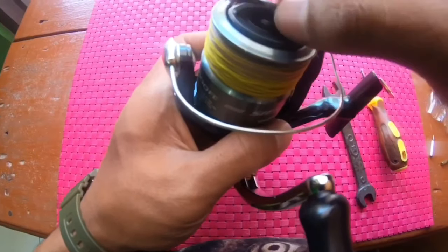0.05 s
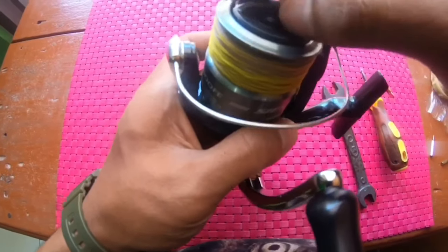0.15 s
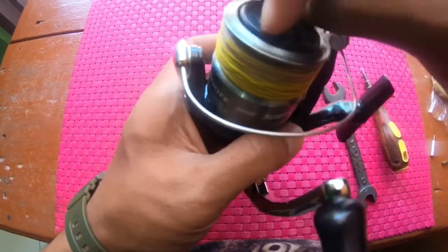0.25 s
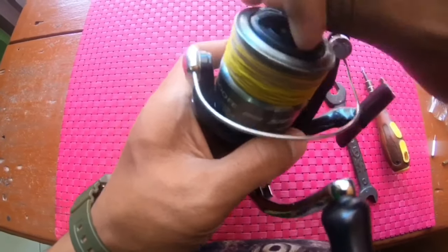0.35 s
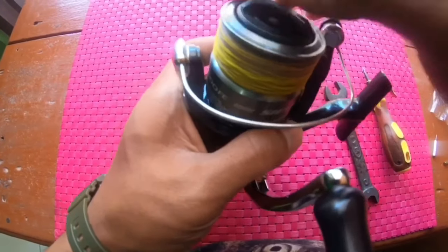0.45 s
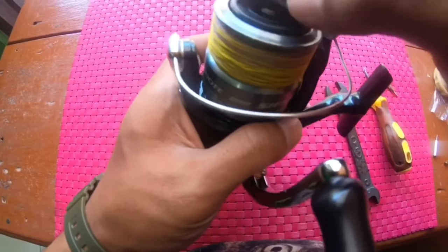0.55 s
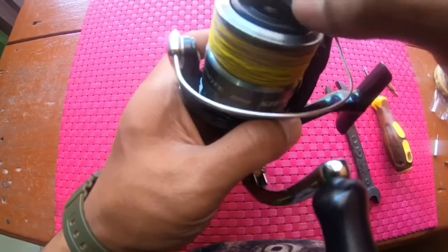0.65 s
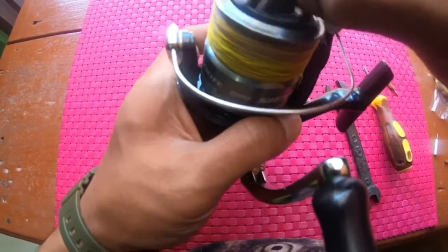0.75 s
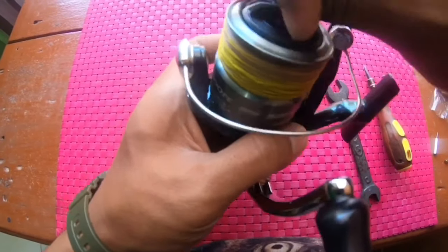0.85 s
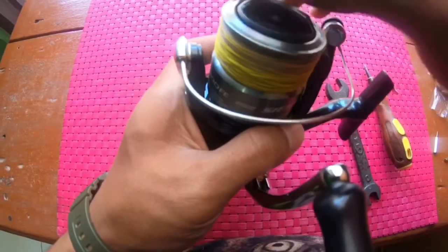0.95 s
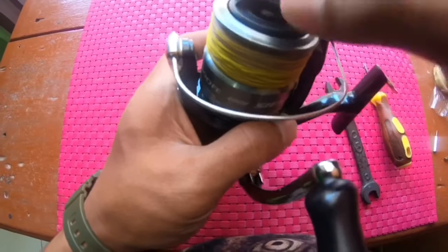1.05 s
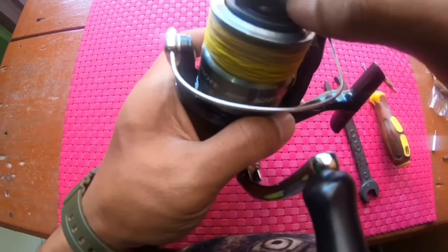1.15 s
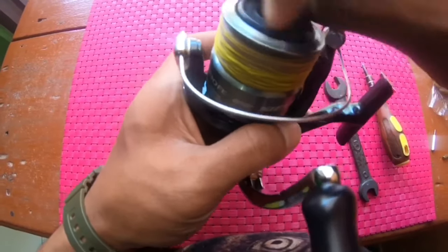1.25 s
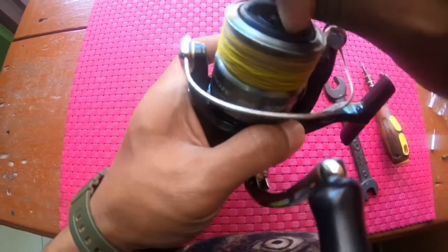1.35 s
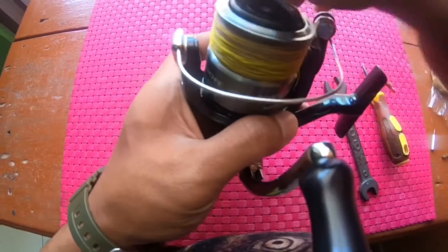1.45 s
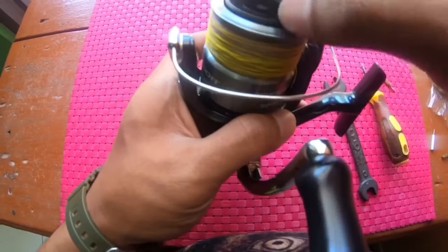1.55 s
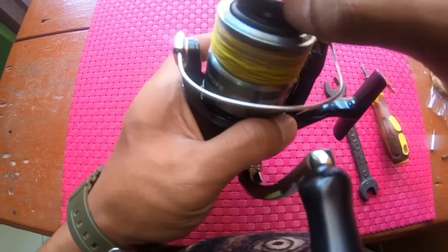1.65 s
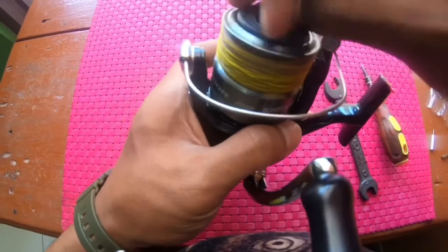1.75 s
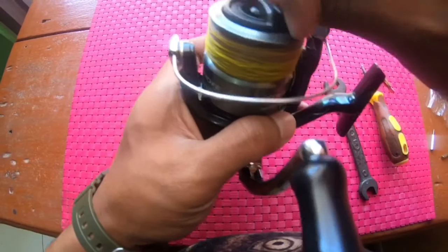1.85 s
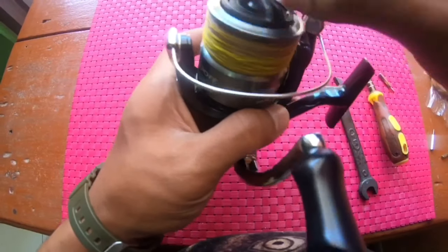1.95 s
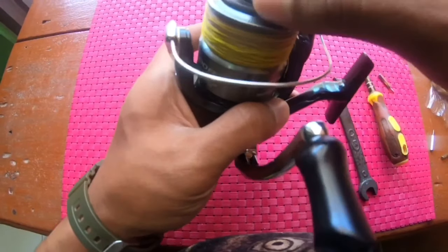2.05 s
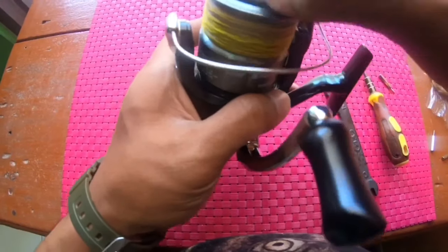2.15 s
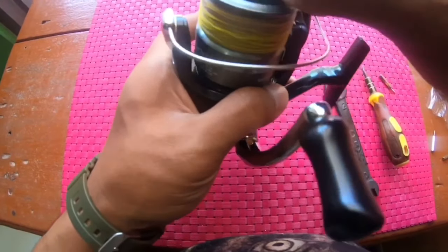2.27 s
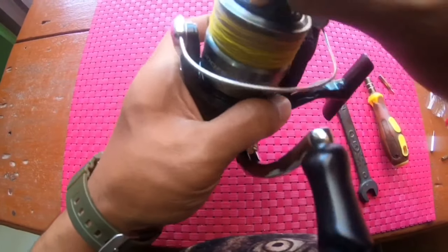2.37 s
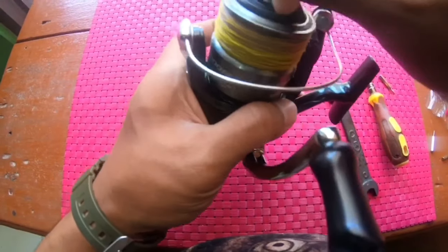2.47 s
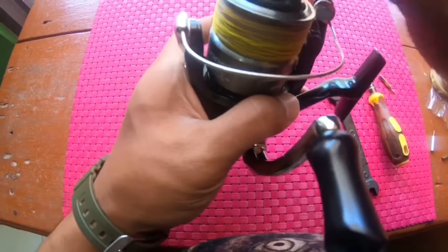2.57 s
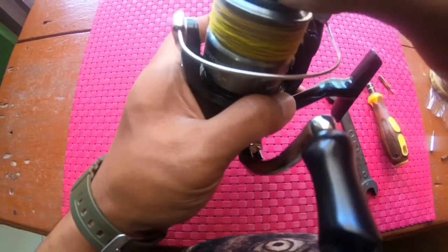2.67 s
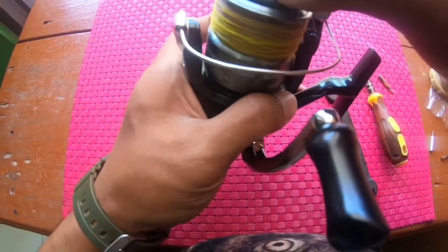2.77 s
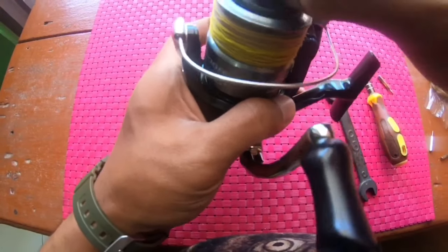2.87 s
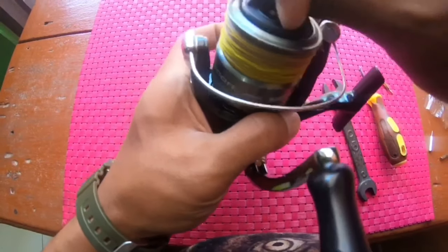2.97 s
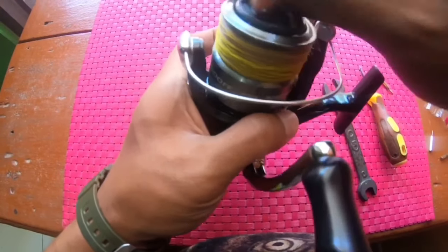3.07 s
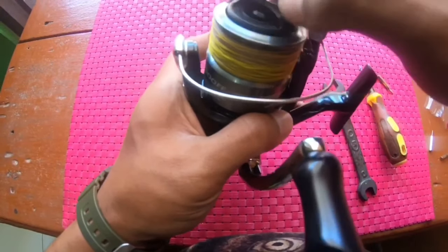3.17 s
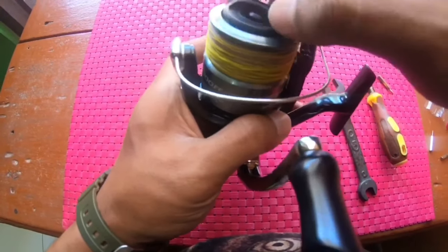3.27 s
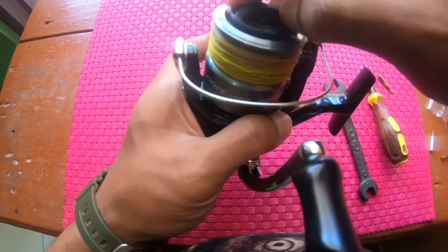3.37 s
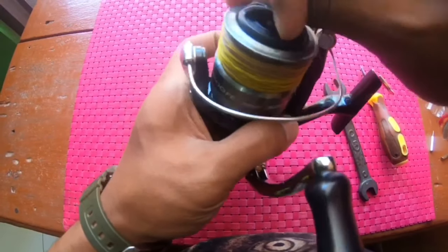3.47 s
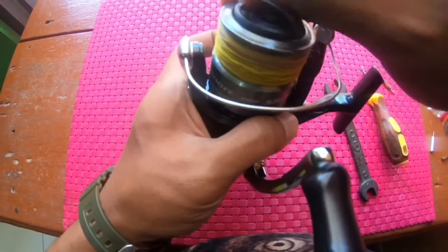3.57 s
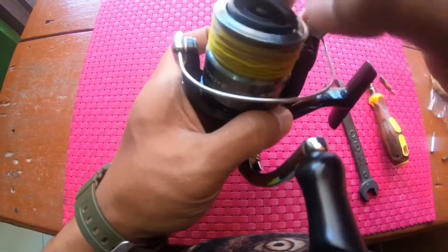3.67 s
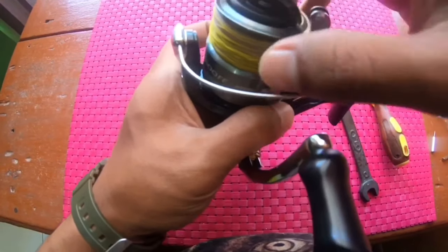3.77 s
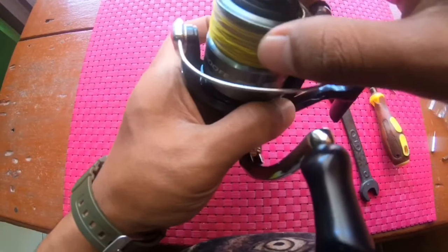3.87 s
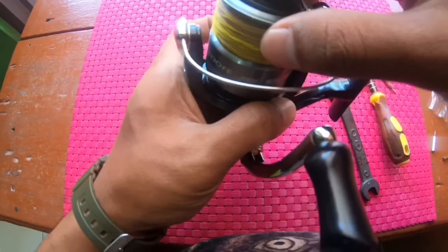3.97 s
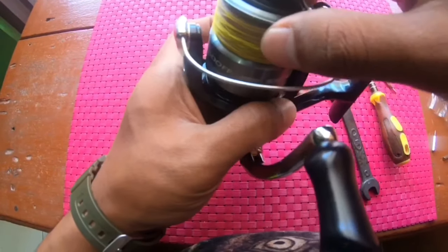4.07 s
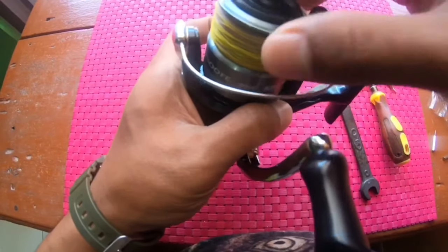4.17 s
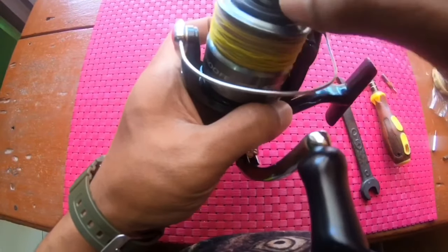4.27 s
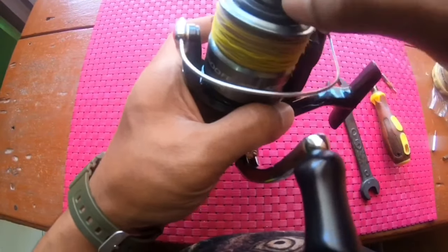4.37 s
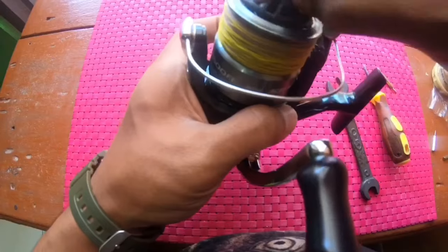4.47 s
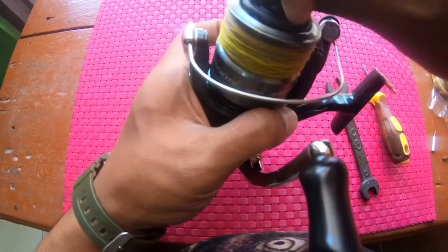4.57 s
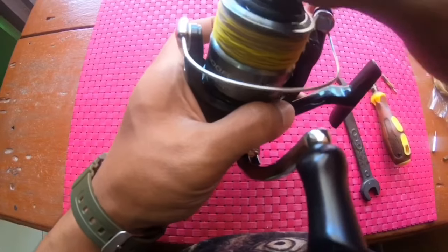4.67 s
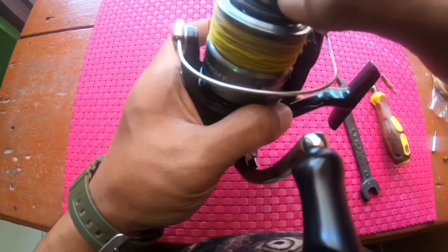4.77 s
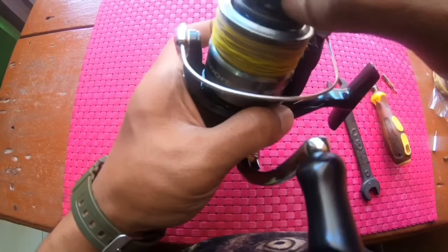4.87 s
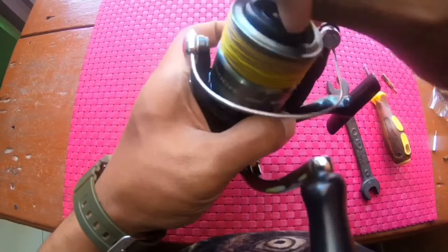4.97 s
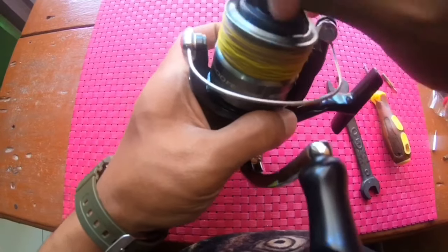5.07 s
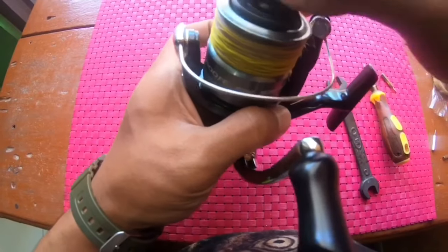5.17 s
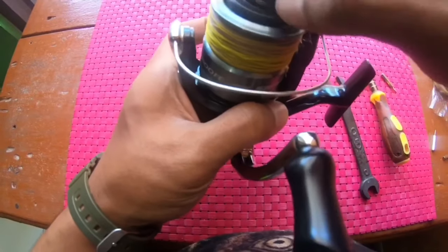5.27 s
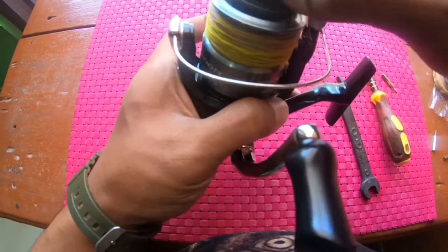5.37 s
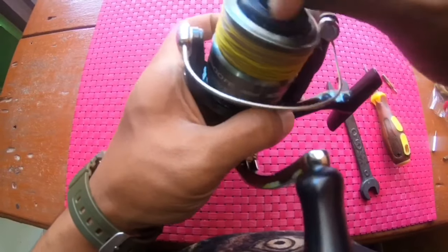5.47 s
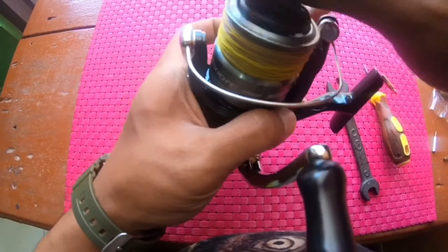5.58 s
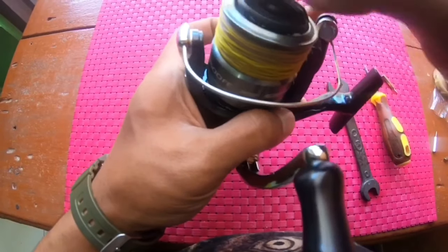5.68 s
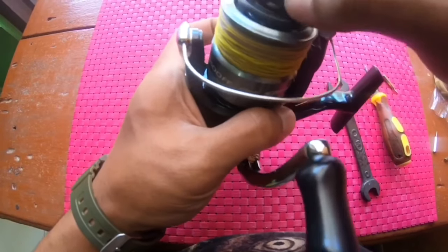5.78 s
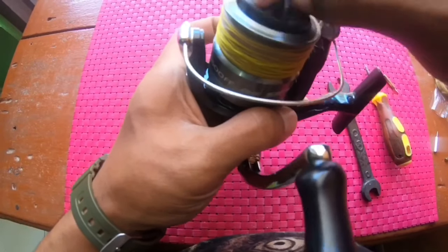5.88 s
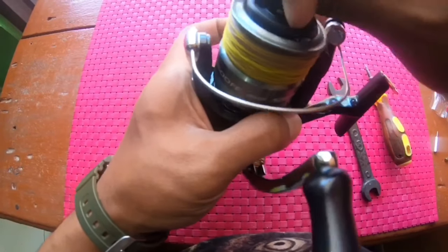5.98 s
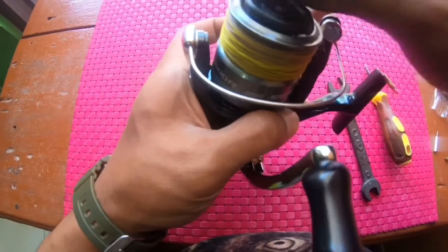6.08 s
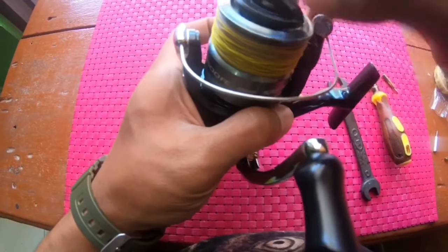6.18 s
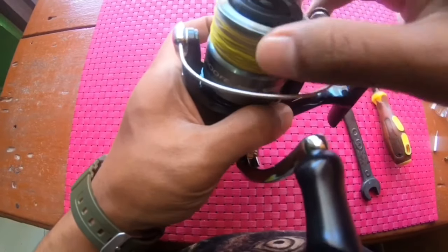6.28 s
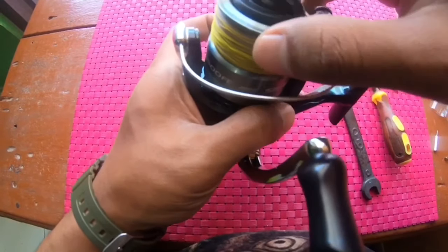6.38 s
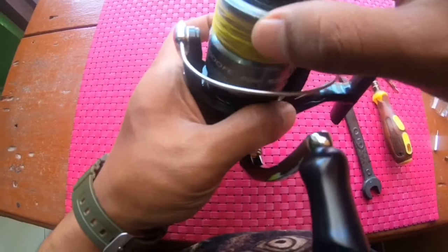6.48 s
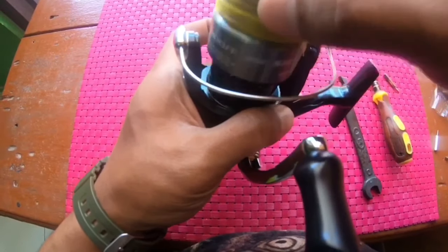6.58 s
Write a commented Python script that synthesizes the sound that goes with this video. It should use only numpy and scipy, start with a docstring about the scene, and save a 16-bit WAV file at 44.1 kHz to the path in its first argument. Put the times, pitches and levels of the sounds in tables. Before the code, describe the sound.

Close stereo microphones catch a fishing reel knob being turned by hand in a small indoor workspace. Rapid bursts of hard, bright, slightly metallic clicks come about every half second, separated by short gaps with faint dull ticks. Soft low bumps follow the hands shifting. Midway the clicking pauses after two tiny skin squeaks, then resumes until about six seconds, ending with rustling skin over quiet room rumble and hiss.

```python
"""The drag knob of a spinning reel is unscrewed by hand in a small workroom, close to the microphones.
From the start there are filtered noises: a rumble that swells early, a low hum that dies away, hiss and rustling skin.
Then the knob turns in short jerks: a sprung pin snaps over a few teeth, and each snap rings in knob and spool.
Low bumps of noise mark the hands shifting, and light touches tick faintly, ringing the same parts more dully.
Midway, two thin squeaks of narrow noise come from the fingertips; the room adds echoes and a short tail."""
import sys
import numpy as np
from scipy import signal
from scipy.fft import rfft, irfft, next_fast_len
from scipy.io import wavfile

SR = 44100
rng = np.random.default_rng(int(sys.argv[2]) if len(sys.argv) > 2 else 0)


def master(y):
    """Save y as 16-bit WAV."""
    cut = np.clip(np.atleast_2d(y).T, -1, 1)
    pcm = np.round(cut * 32767)  # scale
    wavfile.write(sys.argv[1], SR, pcm.astype(np.int16))


N = 292481
TIME = np.arange(N) / SR   # seconds


def from_db(db):
    """Turn decibels into a gain."""
    return 10 ** (np.asarray(db) / 20)


def unit_energy(x):
    """Scale along the last axis so that the squares add up to one."""
    return x / np.sqrt(np.sum(x ** 2, axis=-1, keepdims=True) + 1e-20)


def at_hz(points, hz):
    """Read a table of frequencies and values at any pitch, on a logarithmic pitch scale."""
    table_hz, value = np.transpose(points)
    return np.interp(np.log(hz + 1e-9), np.log(table_hz), value)


def at_second(points, s):
    """Read a table of times and values at any moment."""
    return np.interp(s, *np.transpose(points))


def stereo(mid, side, alike):
    """Make left and right with the given likeness from two unrelated sounds."""
    alike = np.clip(alike, -1, 1)
    mid = mid * np.sqrt((1 + alike) / 2)
    side = side * np.sqrt((1 - alike) / 2)
    return np.array([mid + side, mid - side])


def diffuse_noise(colour):
    """Coloured noise arriving from all sides, so left and right differ by pitch; rms 1."""
    # How alike left and right are. Each row: frequency in Hz, likeness from 0 to 1.
    room_likeness = [(40, 0.86), (200, 1), (640, 0.48), (1400, 0), (3500, 0.91), (5000, 0.46),
                     (9000, 0.084)]
    size = next_fast_len(N)
    hz = np.arange(size // 2 + 1) * SR / size
    pair = stereo(*rfft(rng.standard_normal((2, size))), at_hz(room_likeness, hz))
    noise = irfft(pair * from_db(at_hz(colour, hz)), size)[:, :N]
    return unit_energy(noise) * np.sqrt(N)


def swells(rows):
    """Gain over time of bell-shaped swells whose powers add."""
    power = sum(from_db(db) ** 2 * np.exp(-((TIME - s) / width_s) ** 2) for s, width_s, db in rows)
    return np.sqrt(power)


def resonate(x, hz, width_hz):
    """A resonance applied twice: it swells over a few cycles and falls off steeply around its pitch."""
    r = np.exp(-np.pi * width_hz / SR)
    section = [1, 0, -1, 1, -2 * r * np.cos(2 * np.pi * hz / SR), r * r]
    return signal.sosfilt([section, section], x + 1e-18)


def add(track, s, sound):
    """Mix a short stereo sound into the track at time s."""
    start = max(round(s * SR), 0)
    track[:, start:start + sound.shape[1]] += sound[:, :max(N - start, 0)]


def room_air():
    """Low rumble and hiss of the room: two steady coloured noises, the rumble with an early swell."""
    # Colours of the two noises. Each row: frequency in Hz, relative level in dB.
    rumble_colour = [(20, -31.5), (60, -15.5), (115, -0.5), (145, 2), (175, -0.5), (210, -4.5), (250, -3),
                     (340, -10), (480, -21), (900, -26), (3000, -77)]
    hiss_colour = [(250, 6), (480, 0.5), (680, 0.5), (1000, -4), (1400, -1.5), (3200, -8.5), (4500, -12),
                   (7500, -15.5), (9300, -20.5), (11500, -41), (15000, -70)]
    # The rumble's swell: peak in seconds, half width in seconds, level in dB.
    rumble_swell = (.12, 0.12, -49.5)
    rumble_gain = np.hypot(from_db(-54), swells([rumble_swell]))
    return rumble_gain * diffuse_noise(rumble_colour) + from_db(-57) * diffuse_noise(hiss_colour)


def hum():
    """Noise through a narrow resonance makes a faint low hum that wavers and dies away."""
    pitch_hz, width_hz, fade_s, level_db = 164, 11.5, 1.6, -54
    tone = unit_energy(resonate(rng.standard_normal(N), pitch_hz, width_hz)) * np.sqrt(N)
    return swells([(0, fade_s, level_db)]) * tone


def steady_grip():
    """The hands holding the reel make a steady dull noise."""
    # Colour of the handling noise. Each row: frequency in Hz, relative level in dB.
    handling_colour = [(18, -34), (35, -3.5), (60, 19.5), (85, -2), (115, 8.5), (170, -3.5), (400, -40.5)]
    return from_db(-57.5) * diffuse_noise(handling_colour)


def skin():
    """Skin rustles all the while as coloured noise, and swells when it slides on the reel."""
    # Colour of the rustle. Each row: frequency in Hz, relative level in dB.
    rub_colour = [(600, -16.5), (1500, 1.5), (3000, 4), (4800, -5), (7500, -2.5), (10000, -16.5),
                  (15000, -49)]
    # Slides. Each row: peak in seconds, half width in seconds, level in dB.
    rub_rows = [(3.25, 0.31, -63), (6.39, 0.046, -57.5), (6.6, .1, -56.5)]
    return np.hypot(from_db(-70), swells(rub_rows)) * diffuse_noise(rub_colour)


def contact(ring_hz, bright_db, body_db, scrape_s, bounce_db, size=1100):
    """A brief chatter over an edge and a weaker rebound set all the ringing parts going; unit energy."""
    # Ways the knob and spool ring.
    # Each row: frequency in Hz, width in Hz, level in dB before tilt and chance, left minus right in dB.
    ring_modes = [(826, 1920, -23.5, 8.5), (1282, 189, -20.5, 3.5), (1910, 530, -18, 7),
                  (2505, 637, -9, 2.5), (3580, 786, 2.67, 1), (3550, 260, -47, -16),
                  (4805, 1540, -14.5, 15), (6750, 1250, -0.5, 1.5), (7453, 920, -3, 4),
                  (8820, 400, -16, -0.5), (12780, 1700, -15, -1.5), (14740, 3100, -21.5, 16)]
    # How alike left and right are struck. Each row: frequency in Hz, likeness from 0 to 1.
    near_likeness = [(1200, .65), (2500, .985), (3700, .99), (5000, .85), (7500, .88), (12000, .45)]
    reference_hz = 3612   # a ring_hz of this value leaves the knob's modes unshifted

    # time counted in scrape lengths, which vary by chance
    t = np.arange(size) / SR / (scrape_s * from_db(rng.normal(0, 3.15)))
    late = np.maximum(t - rng.uniform(1.0, 2.4), 0)
    rebound_gain = from_db(bounce_db + rng.uniform(-5, 5))
    push = np.sqrt(t) * np.exp(-t ** 2) + rebound_gain * np.sqrt(late) * np.exp(-late ** 2)
    chatter = rng.standard_normal((2, size)) * push

    out = np.zeros((2, size))
    for hz, width_hz, mode_db, pan_db in ring_modes:
        tilt_db = np.interp(hz, [2700, 3300, 4300, 5800], [body_db, 0, 0, bright_db])
        # pin seat and finger grip shift the rings a little; outside the knob's own, broad ones move most
        if 3000 < hz < 3800:
            shift = ring_hz / reference_hz
        else:
            shift = 1 + min(width_hz / hz, .3) * rng.normal(0, .14)
        left, right = resonate(stereo(*chatter, at_hz(near_likeness, hz)), hz * shift, width_hz)
        # the bright ring around 7 kHz reaches the right microphone a sample later
        ring = np.array([left, np.roll(right, int(5500 < hz < 10000))])
        sides_db = np.array([[.5], [-.5]]) * pan_db
        out += unit_energy(ring) * from_db(mode_db + tilt_db + rng.normal(0, 1) + sides_db)
    return out / np.sqrt(np.sum(out ** 2) / 2)


def snaps():
    """Time, energy, ring and brightness of each tooth: almost even spacing, the ring tending to climb in a jerk."""
    # Jerks of the knob. Each row: start in seconds, tooth spacing in ms, number of teeth,
    # energy in dB and brightness in dB, both before the changes from tooth to tooth.
    jerk_rows = [(.2354, 11, 2, 3, 5), (.2702, 0, 1, 1.5, 7), (.2758, 17.7, 2, 1.5, 5),
                 (.3172, 16, 3, 2, 2), (.7532, 0, 1, 1, 3), (.7818, 10.6, 2, 3.3, -1),
                 (.8175, 13.3, 3, 3.5, -2), (.8628, 11.3, 2, 3, -4), (.8999, 0, 1, 4, -3),
                 (1.2261, 14, 2, 5, -1), (1.2695, 10.4, 3, 4.5, -3), (1.3074, 10.7, 2, 2, 0),
                 (1.3259, 0, 1, 5, -5), (1.7186, 14.1, 4, 5.5, -7), (1.7898, 16, 3, 2.5, -1),
                 (2.2748, 0, 1, 1, 3), (2.3476, 8.8, 3, 3.5, 0), (2.381, 12.4, 3, 4.5, 3),
                 (2.4311, 0, 1, 1.5, -2), (2.4625, 0, 1, 5.5, -11), (2.8663, 12, 2, 4, -4),
                 (2.9022, 9.2, 2, 5, -7), (2.9435, 14.1, 5, 2, 0), (3.377, 13.2, 2, 3, -6),
                 (3.4185, 10.1, 2, 2.5, 0), (3.4505, 13, 2, 3.5, 3), (3.4793, 8.1, 3, 3.5, -3),
                 (4.4539, 10.1, 2, 5, -8), (4.487, 9.7, 2, 4.7, -5), (4.5255, 11.8, 5, 3, -1),
                 (4.92, 15, 2, 3, -1), (4.952, 14.2, 6, 3.5, -3), (5.4092, 0, 1, 4.5, -5),
                 (5.4288, 9.9, 3, 3.5, -1), (5.465, 18, 5, 1.5, 0), (5.9072, 8.4, 3, 3.5, -2),
                 (5.942, 19.7, 2, 3.8, -6), (5.9885, 19.2, 3, 4.2, -6)]
    # How the grip tunes the knob, sinking unevenly overall as it loosens. Each row: time in seconds, ring in Hz.
    knob_ring = [(.3, 3665), (2.4, 3725), (3.4, 3544), (4.5, 3590), (5.0, 3494), (5.95, 3550)]
    # from the first tooth of a jerk to the last
    ring_rise_hz, level_rise_db = 110, 0.04
    # chance (rms): spacing as a share, level, ring as the pin seats differently, brightness
    spacing_spread, level_spread_db, ring_spread_hz, bright_spread_db = 0.049, 1.65, 100, 1
    # a jerk with closer teeth than this stalls on its last tooth and lets the pin down gently
    quick_ms, stall_db = 10, -6

    for start_s, spacing_ms, teeth, db, bright_db in jerk_rows:
        for k in range(teeth):
            progress = (k - (teeth - 1) / 2) / max(teeth - 1, 1)   # -0.5 to 0.5; 0 for a lone tooth
            delay, strength, seat, colour = rng.uniform(-1, 1, 4) * np.sqrt(3)   # rms 1
            s = start_s + (k + spacing_spread * delay * (k > 0)) * spacing_ms / 1000
            stalls = 0 < k == teeth - 1 and spacing_ms < quick_ms
            snap_db = db + level_rise_db * progress + stall_db * stalls + level_spread_db * strength
            ring_hz = at_second(knob_ring, s) + ring_rise_hz * progress + ring_spread_hz * seat
            yield s, snap_db, ring_hz, bright_db + bright_spread_db * colour


def clicker():
    """The sprung pin drops into one tooth after another; brighter snaps also tend to sound fuller."""
    # How freely the spool rings in the changing grip. Each row: time in seconds, boost of the low rings in dB.
    spool_freedom = [(.3, 0.5), (1.3, 1), (1.75, 4), (2.3, 2), (3.4, 1), (4.5, -1.5), (5.5, 0), (5.9, 1)]
    out = np.zeros((2, N))
    for s, db, ring_hz, bright_db in snaps():
        body_db = at_second(spool_freedom, s) + .5 * bright_db + rng.normal(0, 2)
        snap = contact(ring_hz, bright_db, body_db, scrape_s=0.0009, bounce_db=-16)
        add(out, s, from_db(db) * snap)
    return out


def spool_rim(x, hz, width_hz, db):
    """The metal rim of the spool, a narrow resonance, sings on faintly; db is relative to the reel's sound."""
    return unit_energy(resonate(x, hz, width_hz)) * np.sqrt(np.sum(x ** 2) / 2) * from_db(db)


def room(x, size=30000):
    """A few near reflections and a diffuse tail of fading noise, whose treble lasts slightly longer."""
    # Colour of the tail before it fades. Each row: frequency in Hz, relative level in dB.
    tail_colour = [(400, 12.5), (1300, 4), (3000, -3.5), (5000, -0.5), (7500, 0.5), (10000, 1.5),
                   (12500, 0), (15000, -8.5)]
    # Nearby surfaces. Each row: delay in seconds, level in dB.
    echo_rows = [(.0035, -21), (.0085, -34.5), (0.0129, -33)]
    low_t60_s, treble_t60_s = 0.39, 0.44   # seconds to fade by 60 dB
    t = TIME[:size]
    noise = diffuse_noise(tail_colour)[:, :size]
    low = signal.sosfiltfilt(signal.butter(2, 5500, fs=SR, output="sos"), noise)
    treble = noise - low
    tail = low * from_db(-60 * t / low_t60_s) + treble * from_db(-60 * t / treble_t60_s)
    response = from_db(-17) * unit_energy(tail * (1 - np.exp(-t / 0.002)))   # soft onset
    for delay_s, db in echo_rows:
        add(response, delay_s, from_db(db) * np.ones((2, 1)))
    return signal.fftconvolve(x, response, axes=1)[:, :N]


def bumps():
    """Each shift of the hands is a short swell of low, boomy noise."""
    # Shifts of the reel. Each row: peak in seconds, half width in seconds, pitch in Hz, level in dB.
    bump_rows = [(.27, 0.079, 70.6, -49), (.9, .2, 110, -50.5), (1.03, .16, 56, -47),
                 (2.02, 0.06, 61.6, -49), (4.5, 0.16, 103.2, -45.5), (4.98, 0.047, 74, -44),
                 (5.54, 0.062, 62, -44.5), (6.13, 0.19, 65, -42), (6.6, 0.037, 64, -46.5)]
    noise = stereo(*rng.standard_normal((2, N)), alike=0.91)
    out = np.zeros((2, N))
    for s, width_s, hz, db in bump_rows:
        boom = unit_energy(resonate(noise, hz, 0.68 * hz)) * np.sqrt(N)
        out += swells([(s, width_s, db)]) * boom
    return out


def ticks():
    """Regripping fingers and loose parts touch lightly: duller, with more of the spool's body."""
    # Touches. Each row: time in seconds, level in dB before the shared gain.
    tick_rows = [(0.6235, -38), (0.7048, -37), (1.1327, -21.5), (1.4197, -34.5), (1.4466, -28.5),
                 (1.624, -31), (1.6374, -38.5), (1.8953, -28), (1.9254, -29.5), (2.1061, -42),
                 (2.163, -33.5), (2.7007, -33.5), (3.9848, -40), (3.9962, -38.5), (4.1623, -32.5),
                 (4.4029, -36), (4.8178, -28.5), (5.1067, -34.5), (5.1286, -35), (5.1662, -34.5),
                 (5.2732, -35.5), (5.661, -35), (6.5162, -34)]
    shared_gain_db = 12
    strays_per_s, stray_db = 1.2, -46   # fainter touches at random times, also before the shared gain
    stray_times = rng.uniform(0, N / SR, round(strays_per_s * N / SR))
    strays = [(s, stray_db) for s in stray_times]
    out = np.zeros((2, N))
    for s, db in list(tick_rows) + strays:
        ring_hz, body_db = rng.normal(3590, 360), rng.normal(10.3, 0.83)
        touch = contact(ring_hz, -8.0, body_db, scrape_s=0.001, bounce_db=-10)
        add(out, s, from_db(db + shared_gain_db) * touch)
    return signal.sosfilt(signal.butter(2, 8000, fs=SR, output="sos"), out)


def squeaks():
    """Fingertip skin sticks and slips on the knob: narrow noise heard as a thin, wavering tone."""
    # Squeaks. Each row: start in seconds, length in seconds, pitch in Hz, level in dB before the fade in and out.
    squeak_rows = [(3.18, .085, 3300, -60), (3.292, .036, 2420, -57.5)]
    out = np.zeros((2, N))
    for s, length_s, hz, db in squeak_rows:
        size = round(length_s * SR)
        # the first half lets the resonance settle and is dropped
        settled = resonate(rng.standard_normal(2 * size), hz, 110)[size:]
        tone = unit_energy(settled) * np.sqrt(size)
        add(out, s, from_db(db) * tone * np.hanning(size) * np.ones((2, 1)))
    return out


def scene():
    """The reel close by, in its room, over the steady noises and the handling."""
    background = room_air() + hum() + steady_grip() + skin() + bumps()
    reel = clicker() + ticks() + squeaks()
    reel = reel + spool_rim(reel, hz=3840, width_hz=60, db=-28.5)
    return reel + room(reel) + background


def record(dry):
    """A steep filter cuts the top off above 16.1 kHz."""
    return signal.sosfilt(signal.ellip(10, .2, 70, 16100, fs=SR, output="sos"), dry)


dry = scene()
out = record(dry)
master(out)
```